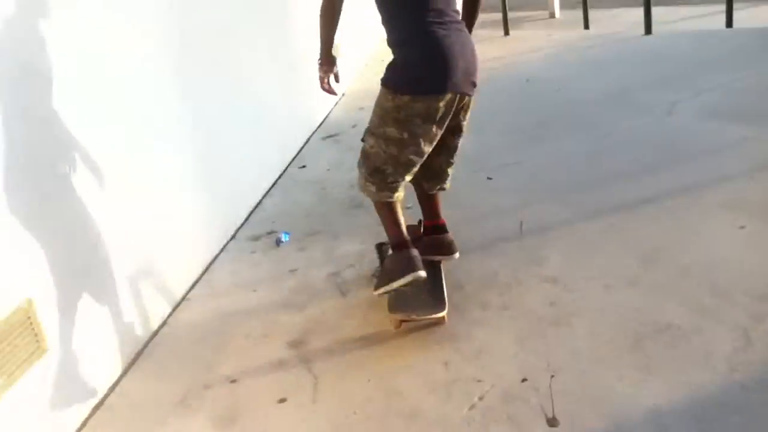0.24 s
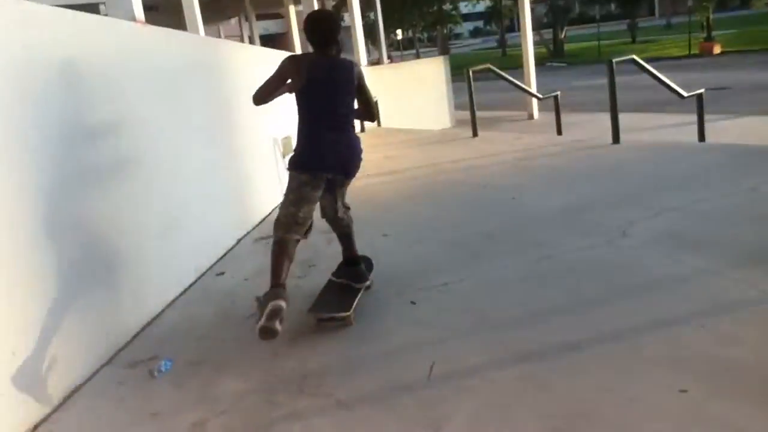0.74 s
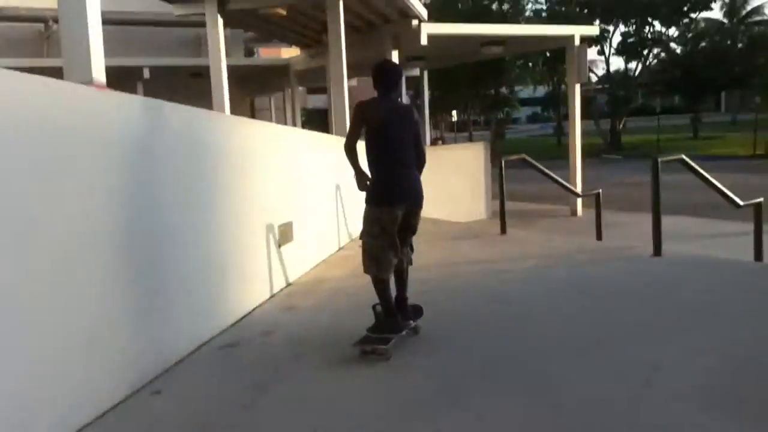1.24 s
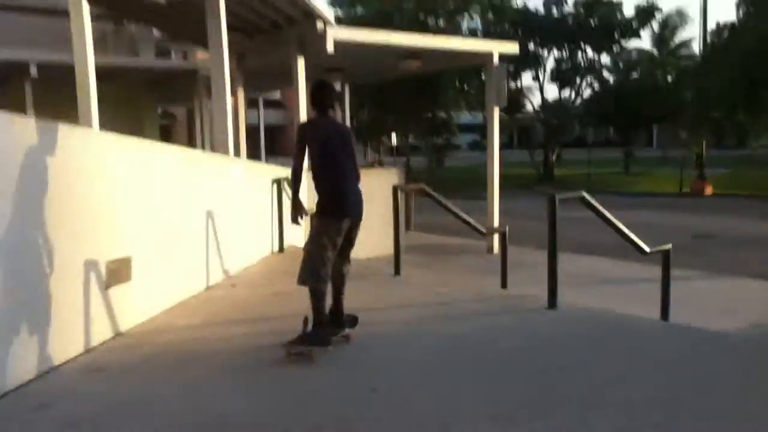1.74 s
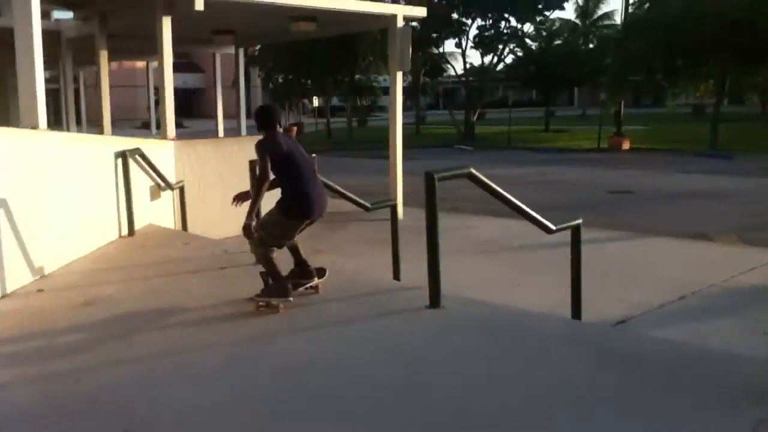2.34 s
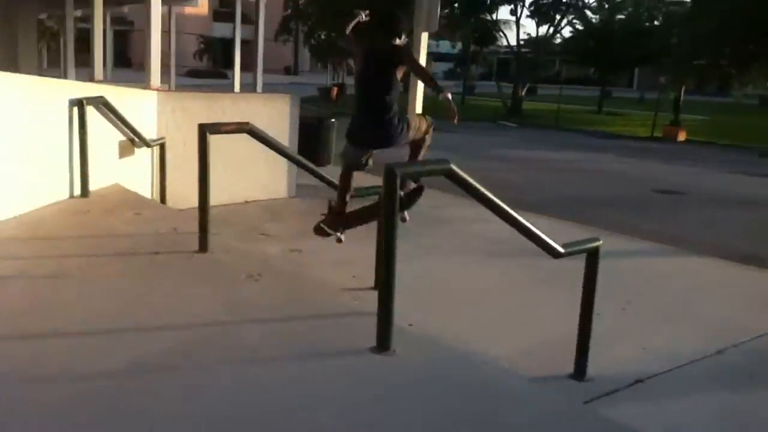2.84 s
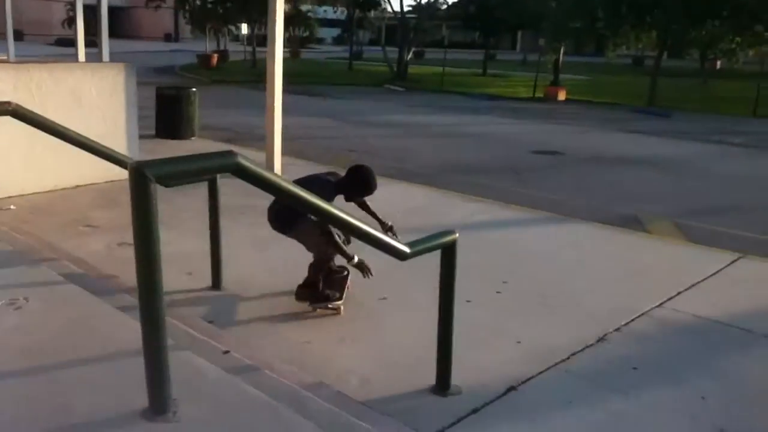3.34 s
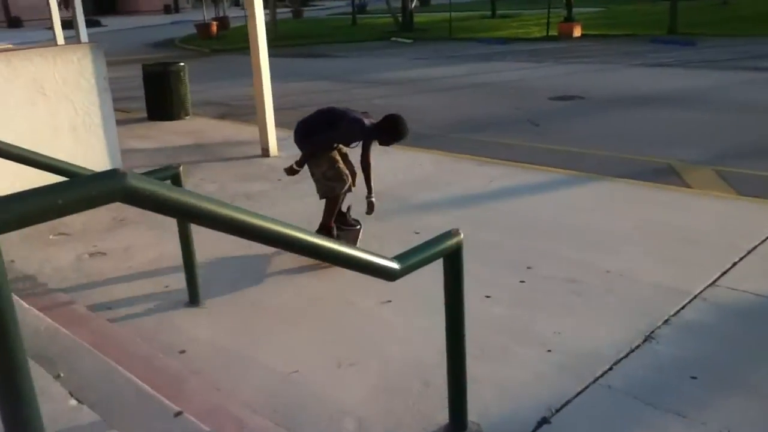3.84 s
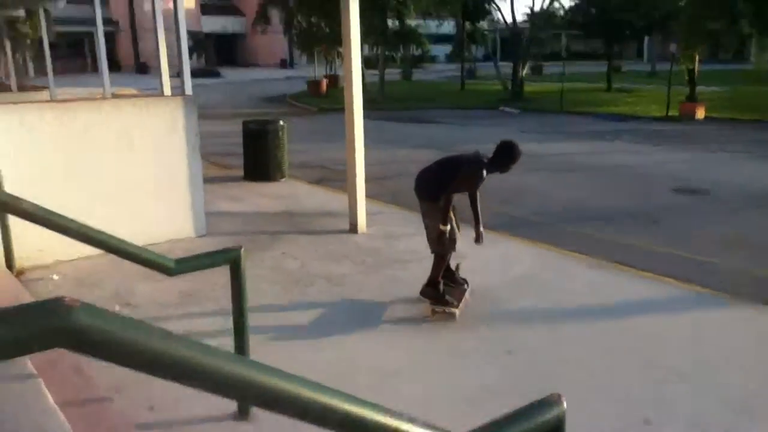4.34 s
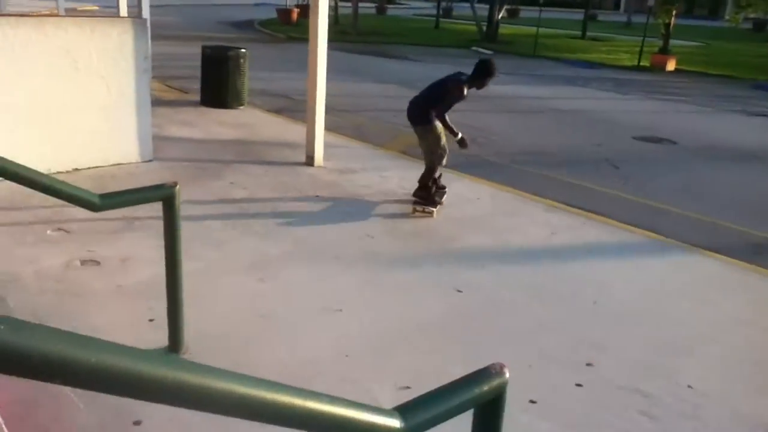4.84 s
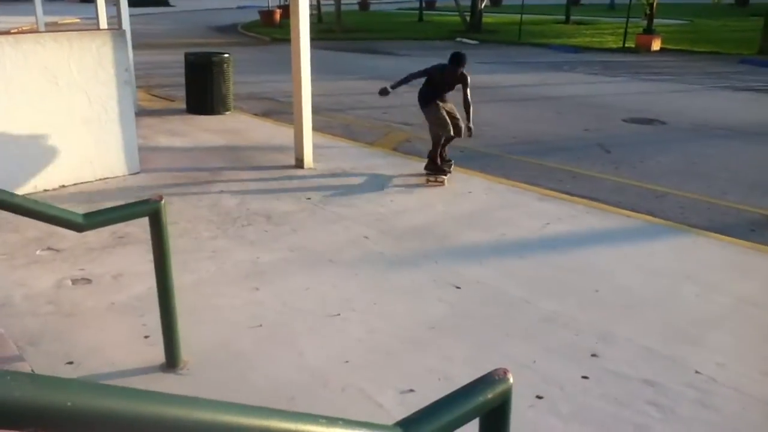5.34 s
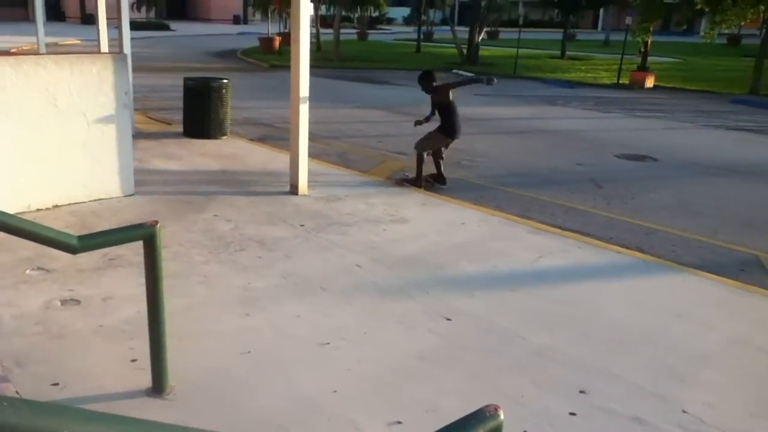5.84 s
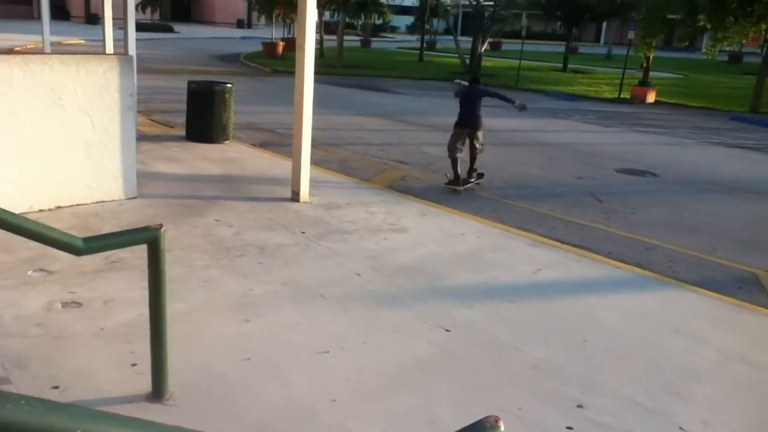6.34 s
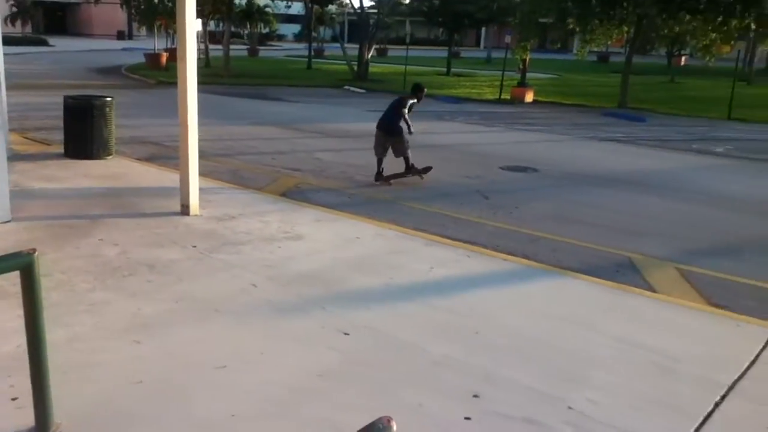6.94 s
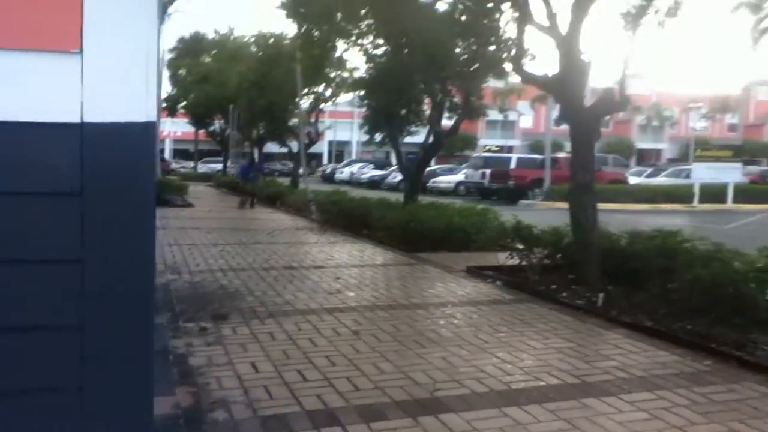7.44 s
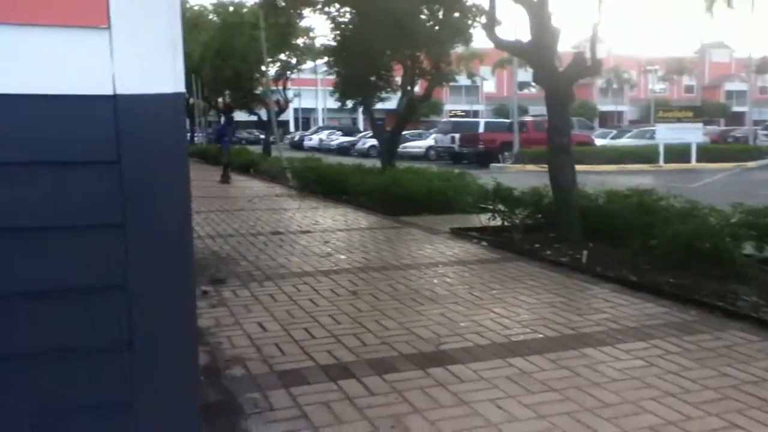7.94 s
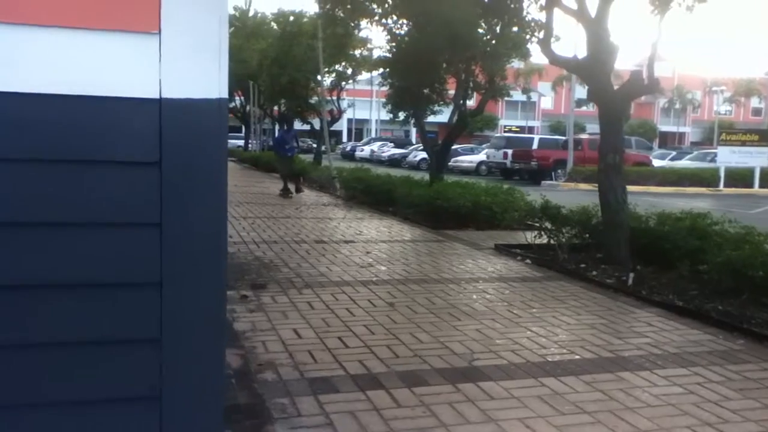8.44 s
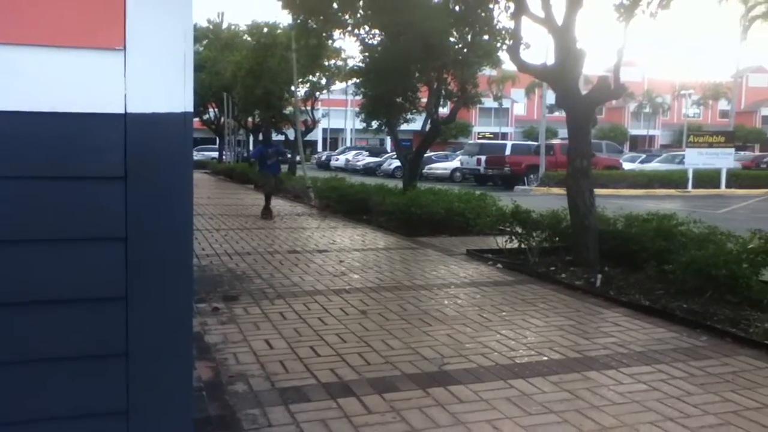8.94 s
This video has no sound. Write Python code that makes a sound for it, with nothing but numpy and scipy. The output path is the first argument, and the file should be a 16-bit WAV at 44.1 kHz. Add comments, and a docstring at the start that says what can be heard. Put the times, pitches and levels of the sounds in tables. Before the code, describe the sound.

A handheld microphone picks up hiss, low town murmur and buffeting wind as skateboard wheels grind over concrete. Two huge handling thuds briefly duck everything. A sharp pop and a brighter, harder landing follow; the rolling recedes, a crack gives a hollow double clack, and a far hop echoes. A brief dropout cuts to a brick path, with a short burst of distant hollow wheel knocks and traffic rush.

```python
"""A skater pushes off over a concrete plaza, wheels growling; gusts and bumps shake the hand-held camera, and
near 2 s the two hardest bumps push its gain control down. At 2.9 s the board pops, lands below a few steps at
3.3 s, crosses a crack in the slab and hops again far off; after a silence at 7.2 s a distant board rattles
over brick paving, with traffic. Impulses and grains of noise ring banks of resonances for board, shoes and
casing; damped cosines make the bumps, coloured noise the wind, town, traffic and hiss, a sine the whine."""
import sys
import numpy as np
from scipy import signal
from scipy.fft import rfft, irfft, next_fast_len
from scipy.io import wavfile
from scipy.ndimage import map_coordinates

SR = 44100
rng = np.random.default_rng(int(sys.argv[2]) if len(sys.argv) > 2 else 0)


def wav_record(signal):
    """Record a signal, one row per channel, as 16-bit PCM in the file named by sys.argv[1]."""
    frames = np.transpose(np.atleast_2d(signal))
    bounded = np.clip(frames, -1, 1)
    # unit amplitude maps onto the largest positive 16-bit level
    quanta = np.round(bounded * 32767).astype(np.int16)
    wavfile.write(sys.argv[1], SR, quanta)


N = 405268


def amp(db):
    """Level to amplitude: 20 dB is a factor of ten."""
    return 10 ** (np.asarray(db) / 20)


def unit(x):
    """Normalisation to an rms of 1."""
    return x / np.sqrt(np.mean(x ** 2) + 1e-20)


def struck(x):
    """Normalisation of an impact to a standard deviation of 1 over its first 8 ms."""
    return x / x[:SR // 125].std()


def along(points, hz):
    """Interpolation of (f, value) points along a logarithmic frequency axis."""
    f, value = np.transpose(points)
    return np.interp(np.log(hz + 1), np.log(f + 1), value)


def curves(rows):
    """Linear interpolation in time: one curve for each column after t."""
    s, *columns = np.transpose(rows)
    t = np.arange(N) / SR
    return [np.interp(t, s, column) for column in columns]


def wobble(rate):
    """Slow random modulation: a smooth curve through normal random knots, rate of them a second."""
    knots = rng.standard_normal(int(N * rate / SR) + 4)
    return map_coordinates(knots, [np.arange(N) * rate / SR])


def filtered(x, response):
    """Linear filtering: the spectrum of x times a complex frequency response."""
    m = next_fast_len(len(x) + SR // 10)
    f = np.fft.rfftfreq(m, 1 / SR)
    return irfft(rfft(x, m) * response(f), m)[:len(x)]


def body(modes, f):
    """Modal superposition: damped resonances summed with alternating sign."""
    total = 0
    for k, (centre, width, db) in enumerate(modes):
        damping = 1j * f * width
        total = total + (-1) ** k * amp(db) * damping / (centre ** 2 - f ** 2 + damping)
    return total


def focus(f, hz, octaves):
    """Spectral weighting: a soft hump around hz, down to half at this many octaves away."""
    return 1 / (1 + (np.log2((f + 1) / hz) / octaves) ** 2)


def noise(spectrum):
    """Spectral shaping: white noise coloured by a spectrum, at an rms of 1."""
    return unit(filtered(rng.standard_normal(N), lambda f: amp(along(spectrum, f))))


def fade(t, t60):
    """Exponential free decay, 60 dB down after t60."""
    return np.exp(-np.log(1000) * t / t60)


def add(track, s, sound):
    """Superposition: mix a sound into the track from time s."""
    part = track[round(s * SR):][:len(sound)]
    part += sound[:len(part)]


def grains(per_second, spread_db):
    """Random impulse train: tiny impacts at random times and of uneven size."""
    hits = rng.random(N) < per_second / SR
    return hits * rng.standard_normal(N) * amp(spread_db * rng.standard_normal(N))


# Clacks of the board, and taps of the pushing foot, on the ground: [t/s, crack level/dB before crack_db,
# knock level/dB re crack level before knock_db, centre of the ring f/Hz, spread/octaves, chatter t60/s]
STRIKES = [(0.1784, -44, -22, 4500, 2.5, 0.083), (0.2754, -33, -11, 1680, 0.52, 0.031),
           (0.7295, -41.5, -10, 3500, 2.7, 0.064), (0.7701, -41, -6, 2200, 0.38, 0.058),
           (0.9564, -42, -19, 4500, 2.3, .06), (2.858, -33, -4.5, 2500, 1.3, 0.087),
           (3.2944, -28, -7.5, 2920, 0.64, 0.1), (3.3024, -22, -14.5, 3450, 0.85, 0.033),
           (3.3258, -31.5, -12, 2200, 1, 0.054), (3.3357, -29.5, -7, 2000, 1, 0.069),
           (3.3534, -28, -11, 2040, 1.1, 0.075), (4.698, -31, 6.5, 2740, 0.34, 0.029),
           (4.7129, -40.5, 5.5, 2400, 0.73, 0.055), (4.7377, -41, -12, 2630, .4, 0.045),
           (5.7134, -39.5, -13.5, 3900, 1, 0.085), (5.9874, -40.5, -12, 2410, 1.3, .08),
           (5.9938, -39, -16, 2000, 1.4, .06), (6.0172, -42.5, -0.5, 3000, 1.3, 0.096),
           (6.0493, -35.5, -4, 2450, 0.8, .1), (6.6024, -43.5, -9.5, 2620, .9, 0.073)]
# Modes, low (knock) and high (crack): [f/Hz, width/Hz, level/dB]
KNOCK_MODES = [(285, 61, 6.5), (600, 83, 12.5), (840, 62, 4.5), (850, 130, -11), (1074, 460, -12)]
CRACK_MODES = [(1230, 610, 3.5), (1630, 130, 11.5), (1820, 300, 8.5), (2390, 295, 7.5), (2870, 130, 5.5),
               (3300, 980, -2), (4370, 280, 5.5), (4560, 500, 1.5), (7050, 590, -2.5), (8600, 2300, -7)]
REBOUND_S, REBOUND_DULL_DB = .0105, 3.5  # delay, and rise of the knock over the crack, per rebound
REBOUND_LIFE = 1.25  # rebounds die away this many times slower than the chatter


def clacks(knock_db=-7, crack_db=-8, chatter_db=-20, click_db=-5, count=3):
    """Impact excitation: click, quick rebounds and chatter of each clack or foot tap ring modes it picks."""
    out, t = np.zeros(N), np.arange(SR // 4) / SR
    for s, db, low_db, hz, octaves, t60 in STRIKES:
        for k in range(count):
            rattle = unit(rng.standard_normal(len(t)) * (rng.random(len(t)) < .04))
            force = amp(chatter_db) * rattle * fade(t, t60)
            force[16] += 1  # the contact itself
            knock = struck(filtered(force, lambda f: body(KNOCK_MODES, f)))
            # some of the click is heard directly, beside the modes
            crack = struck(filtered(force, lambda f: (body(CRACK_MODES, f) + 1j * amp(click_db))
                                    * focus(f, hz, octaves)))
            blow = amp(low_db + knock_db + k * REBOUND_DULL_DB) * knock + amp(crack_db) * crack
            delay = k * REBOUND_S
            add(out, s + delay, amp(db) * fade(delay, REBOUND_LIFE * t60) * blow)
    return out


# Hollow knocks of the wheels, in paving joints or after a hop: [t/s, thud level/dB before thud_db,
# tick level/dB re thud level before tick_db]
WHEEL_KNOCKS = [(0.462, -41.5, -14), (0.637, -45.5, -11), (1.188, -44.5, -14), (1.426, -41.5, -13),
                (3.187, -41, -19), (4.377, -44.5, -17), (4.775, -43.5, -19), (7.49, -48, -20),
                (7.639, -41.5, -12), (7.723, -42.5, -13), (7.809, -34.5, -16.5), (7.877, -40, -10.5),
                (7.985, -32.5, -11.5), (7.996, -36.5, -12), (8.044, -38, -18), (8.099, -44, -9),
                (8.129, -41, -9.5), (8.156, -40.5, -11.5), (8.211, -43.5, -13)]
# Modes of the thud and of the tick: [f/Hz, width/Hz, level/dB]
THUD_MODES = [(325, 150, -5), (604, 95, 2), (717, 62, 6.5)]
TICK_MODES = [(1700, 200, 5), (2600, 280, 8.5), (3460, 430, 9), (6600, 3200, -16)]


def wheel_knocks(thud_db=-5, tick_db=-4.5, chatter_db=-21, loose_db=-15, chatter_t60=0.054):
    """Impulse response: wheels knock in joints or after a hop, a hollow thud with a tick and gritty chatter."""
    out, t = np.zeros(N), np.arange(SR // 4) / SR
    blow = (t == 0) * 1.0
    for s, db, high_db in WHEEL_KNOCKS:
        chatter = unit(rng.standard_normal(len(t)) * (rng.random(len(t)) < .05))
        chatter *= fade(t, chatter_t60)
        thud = struck(filtered(blow + amp(chatter_db) * chatter, lambda f: body(THUD_MODES, f)))
        tick = struck(filtered(blow + amp(loose_db) * chatter, lambda f: body(TICK_MODES, f)))
        add(out, s, amp(db + thud_db) * thud + amp(db + high_db + tick_db) * tick)
    return out


# Loudness of the wheels on plaza, slabs and brick, before the patches: [t/s, level/dB]
PLAZA_LOUDNESS = [(0, -64), (.35, -66), (.72, -57.5), (1.03, -65), (1.45, -55), (1.95, -54.5), (2.3, -58.5),
                  (2.88, -51), (3.28, -59.5)]
SLAB_LOUDNESS = [(3.42, -63.5), (3.78, -59), (3.94, -62), (4.11, -70.5), (4.77, -64), (5.18, -75),
                 (5.6, -75)]
BRICK_LOUDNESS = [(7.55, -70), (7.714, -57), (7.842, -61), (8.05, -56), (8.298, -68), (8.602, -69),
                  (9.19, -66)]
# Modes of the wheels and of the metal trucks: [f/Hz, width/Hz, level/dB]
WHEEL_MODES = [(548, 117, -2), (695, 133, -1)]
TRUCK_MODES = [(1820, 490, -6.5), (2460, 470, -0.5), (3900, 3300, -9)]
GRIT_DB = -6.5  # trucks re wheels at the reference loudness
GRIT_FOLLOWS, ROLL_REF_DB = 0.61, -58.5  # dB of grit per dB of growl, about this loudness
RUN_FADE_S = .12  # linear fade before the first and after the last point of a run


def rolling(patchy_db=1.8, grit_patchy_db=2.7):
    """Roughness excitation: pavement grains make wheels growl and shake the trucks; one loudness drives both."""
    t, patches = np.arange(N) / SR, wobble(22)  # rougher and smoother ground
    growl = unit(filtered(grains(900, spread_db=0), lambda f: body(WHEEL_MODES, f)))
    grit = unit(filtered(grains(3100, spread_db=2), lambda f: body(TRUCK_MODES, f)))
    out = np.zeros(N)
    for run in (PLAZA_LOUDNESS, SLAB_LOUDNESS, BRICK_LOUDNESS):
        db, = curves(run)
        grit_db = ROLL_REF_DB + GRIT_FOLLOWS * (db - ROLL_REF_DB) + GRIT_DB
        inside = np.minimum(t - run[0][0], run[-1][0] - t)
        gate = np.clip(1 + inside / RUN_FADE_S, 0, 1)
        out += gate * amp(db + patchy_db * patches) * growl
        out += gate * amp(grit_db + grit_patchy_db * patches) * grit
    return out


# Shoes rubbing on grip tape and ground: [t/s, length/s, level/dB before the swell, centre f/Hz]
SHOE_RUBS = [(0.01, 0.12, -56.5, 2700), (0.676, 0.11, -62, 2290), (0.724, 0.058, -56.5, 6100),
             (0.923, 0.017, -48.5, 6800), (1.317, 0.031, -55.5, 10000), (1.465, 0.028, -50.5, 6350),
             (2.87, 0.059, -52, 4480), (3.061, .041, -52.5, 5500), (3.633, 0.075, -56, 4930),
             (6.001, 0.016, -49.5, 9500)]
# Resonances of the soles: [f/Hz, width/Hz, level/dB]
SOLE_MODES = [(2220, 350, 12), (4260, 2200, 6), (6550, 590, 8), (9500, 1400, 3.5)]


def scuffs(octaves=1.0):
    """Frictional excitation: rubber soles slip over grit, a short swell of dense grains in high resonances."""
    out, t = np.zeros(N), np.arange(SR // 4) / SR
    for s, length, db, hz in SHOE_RUBS:
        u = t / length
        rub = unit(filtered(rng.laplace(size=len(t)), lambda f: body(SOLE_MODES, f) * focus(f, hz, octaves)))
        swell = np.minimum(u / 0.055, 1) / (1 + u ** 6)
        add(out, s, amp(db) * rub * swell)
    return out


# Reverberation time of the plaza: [f/Hz, t60/s]
PLAZA_T60 = [(200, 0.52), (2000, 0.26), (10000, 0.68)]


def plaza(x):
    """Diffuse reverberation: walls and steps scatter the sound back; the top treble outlasts the middle."""
    hz, t, z = signal.stft(rng.standard_normal(SR // 2), SR, nperseg=256)
    decay = fade(t, along(PLAZA_T60, hz)[:, None])
    tail = signal.istft(z * decay, SR, nperseg=256)[1]
    tail *= 1 - np.exp(-np.arange(len(tail)) / SR / 0.0097)  # echoes build up over about 10 ms
    return signal.fftconvolve(x, tail / np.linalg.norm(tail))[:N]


# Bumps on the camera: [t/s, swing peak level/dB before the high-pass, pitch f/Hz, rise/s]
CAMERA_BUMPS = [(1.254, -40, 109, 0.007), (1.404, -35, 152, .004), (1.502, -33, 170, 0.003),
                (1.549, -22, 134, 0.0018), (1.9282, -26, 130, 0.00028), (1.9685, 2, 99, 0.0022),
                (1.9739, -15.5, 205, .00007), (1.9877, -7.5, 80, 0.00032), (2.0365, -28, 258, 0.0003),
                (2.064, -25, 150, 0.00076), (2.102, -8, 67.5, 0.0015), (2.115, -16, 190, 0.000095),
                (2.1224, 7, 107, 0.00034), (2.490, -25.5, 146, .00014), (2.613, -36, 148, 0.0017),
                (2.663, -27, 150, 0.0019), (2.7275, -31, 346, 0.00018), (3.133, -24.5, 143, 0.0014),
                (4.602, -37, 197, 0.0025), (4.641, -35, 258, 0.0017), (4.896, -36, 245, 0.0015),
                (4.922, -37.5, 180, 0.0021), (6.835, -42, 200, 0.0041), (7.342, -34, 169, 0.0037),
                (7.489, -37.5, 104, 0.0053), (8.287, -28, 84, 0.013), (8.402, -26, 80, 0.011)]
# Resonances of the casing: [f/Hz, width/Hz, level/dB]
CASING_MODES = [(333, 150, 7), (550, 260, 1), (1340, 700, -16.5), (2950, 600, -18), (5460, 1200, -23)]
SWING_CYCLES, SWING_PER_RISE = 2.17, 2.6  # t60 of a bump: this many cycles plus this many rise times
CASING_DB, CASING_RISE_S, CASING_SOFTER_DB = -49.5, 0.003, 8.5  # rattle at this rise; loss per tenfold rise


def bumps(edge=1.4, rattle_t60=0.057):
    """Damped oscillation: a shoved microphone swings back; sharper bumps rattle the casing more."""
    out, t = np.zeros(N), np.arange(SR // 8) / SR
    for s, db, hz, rise in CAMERA_BUMPS:
        onset = 1 - np.exp(-(t / rise) ** edge)
        t60 = SWING_CYCLES / hz + SWING_PER_RISE * rise
        swing = onset * np.cos(2 * np.pi * hz * t) * fade(t, t60)
        shaking = rng.laplace(size=len(t)) * fade(t, rattle_t60)
        rattle = struck(filtered(shaking, lambda f: body(CASING_MODES, f)))
        rattle_db = CASING_DB - CASING_SOFTER_DB * np.log10(rise / CASING_RISE_S)
        add(out, s, amp(db) * swing / np.abs(swing).max() + amp(rattle_db) * rattle)
    highpass = signal.butter(1, 15, "highpass", fs=SR, output="sos")
    return signal.sosfilt(highpass, out)


# Spectrum of the cars: [f/Hz, relative level/dB per Hz]
TRAFFIC_SPECTRUM = [(100, -28), (300, 11), (450, 3), (900, 7.5), (1400, -14), (3000, -37)]


def traffic(db=-65):
    """Broadband noise: distant cars rush along beside the brick path, from the end of the silence on."""
    after_silence = np.arange(N) / SR > SILENT_SPAN[1]
    return amp(db + wobble(1.5)) * noise(TRAFFIC_SPECTRUM) * after_silence


# Gusts on the microphone: [t/s of the peak, half-length/s to 1/e, level/dB before breeze and flutter]
WIND_GUSTS = [(0.843, 0.19, -58), (1.488, 0.24, -51), (2.07, 0.19, -45.5), (2.64, 0.25, -49.5),
              (3.32, 0.17, -51), (4.638, 0.21, -55.5), (8.0, 0.16, -53.5)]
# Spectra of wind, town and camera hiss: [f/Hz, relative level/dB per Hz]
WIND_SPECTRUM = [(20, -21), (40, -4.5), (70, -2.5), (110, -3), (180, -6), (300, -14.5), (600, -17),
                 (1500, -45)]
TOWN_SPECTRUM = [(25, -40), (60, -6.5), (110, 0), (190, 0), (300, -2.5), (450, -8.5), (800, -20.5),
                 (1500, -24), (4000, -59)]
HISS_SPECTRUM = [(100, 10.5), (1000, 1), (2000, 0), (4000, -1.5), (7000, -2), (9500, -2), (12000, -4),
                 (15500, -9)]
BREEZE_DB, WIND_SWING_DB = -66, 2.6  # wind between the gusts; depth of its flutter


def background(air_db=-57, hiss_db=-58.0, whine_hz=14994, whine_db=-82):
    """Stationary and modulated noise: town murmur, gusts on the microphone, camera hiss and thin whine."""
    t = np.arange(N) / SR
    strength = amp(BREEZE_DB)
    for s, half, db in WIND_GUSTS:
        strength = strength + amp(db) * np.exp(-((t - s) / half) ** 2)
    wind = strength * amp(WIND_SWING_DB * wobble(25)) * noise(WIND_SPECTRUM)
    town = amp(air_db + 0.77 * wobble(5.7)) * noise(TOWN_SPECTRUM)
    phase = 2 * np.pi * whine_hz * t + .4 * wobble(20)
    whine = amp(whine_db) * unit(np.sin(phase))
    return wind + town + amp(hiss_db) * noise(HISS_SPECTRUM) + whine


# The farther the skater, the more of the sound is echo: [t/s, echo level/dB re direct sound]
ECHO_LEVEL = [(0, -13), (2.8, -12), (3.3, -9.5), (4.7, -9.5), (6, -3), (7.2, -1), (7.3, -4)]


def scene(treble_hz=11500):
    """Superposition: clacks, knocks and scuffs lose top treble on the way and echo; the rest is added dry."""
    source = clacks() + wheel_knocks() + scuffs()
    board = filtered(source, lambda f: 1 / np.sqrt(1 + (f / treble_hz) ** 12))
    echo_db, = curves(ECHO_LEVEL)
    echo = plaza(amp(echo_db) * board)
    return (board + echo + rolling() + traffic() + bumps() + background())[None]


def gain_control(x, release_s=1.15, attack_s=.0015, knee=5, ceiling=.98):
    """Dynamic compression: peaks above the ceiling are rounded off and cut the gain quickly; it creeps back."""
    over_db = 20 * np.log10(np.maximum(np.abs(x) / ceiling, 1))
    recovery = np.exp(-np.arange(N) / SR / release_s)
    cut_db = np.maximum.accumulate(over_db / recovery) * recovery  # highest peak so far, dying away
    lag = np.exp(-1 / (SR * attack_s))
    smooth_cut_db = signal.lfilter([1 - lag], [1, -lag], cut_db)
    held = x * amp(-smooth_cut_db)
    return held / (1 + np.abs(held / ceiling) ** knee) ** (1 / knee)


# Silence between plaza and brick path: [start t/s, end t/s]
SILENT_SPAN = (7.2037, 7.2529)
TOP_HZ = 15800


def record(dry):
    """Band limitation: gain control, then a moment of silence, then nothing from TOP_HZ up."""
    t = np.arange(N) / SR
    running = (t < SILENT_SPAN[0]) | (t > SILENT_SPAN[1])
    return filtered(gain_control(dry[0]) * running, lambda f: f < TOP_HZ)[None]


dry = scene()
out = record(dry)
wav_record(out)
```